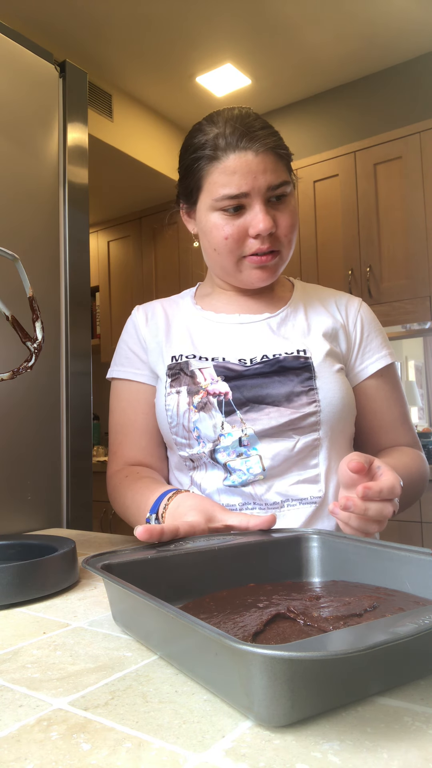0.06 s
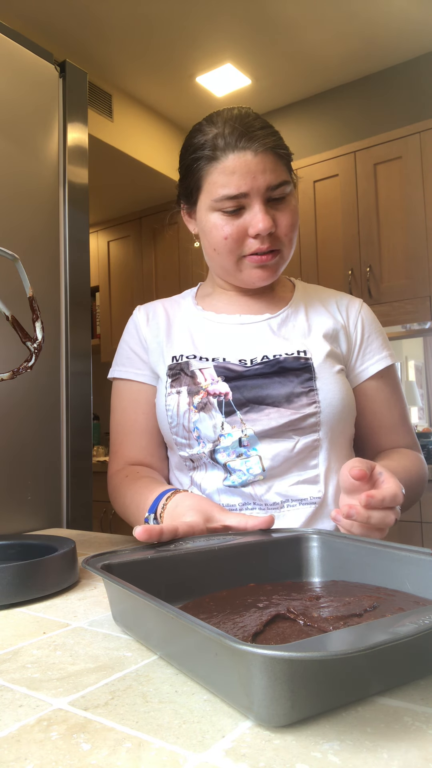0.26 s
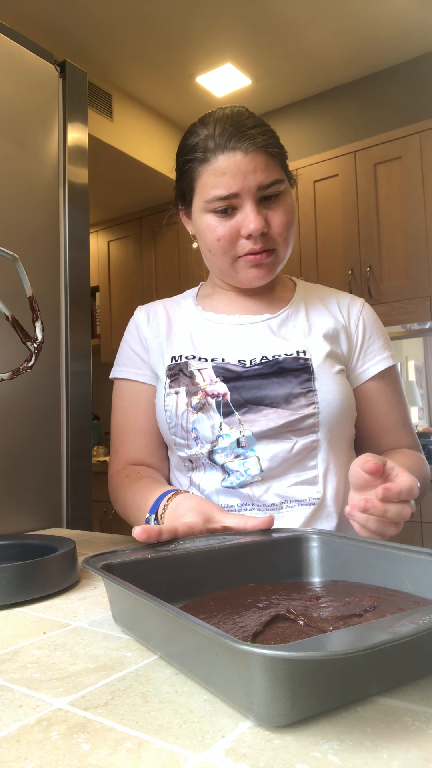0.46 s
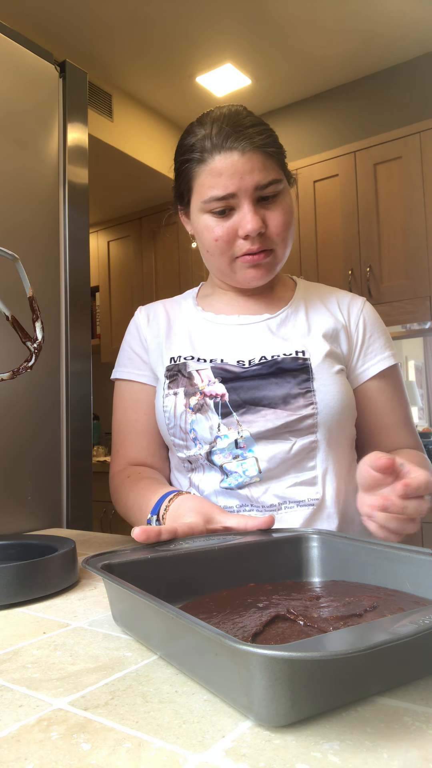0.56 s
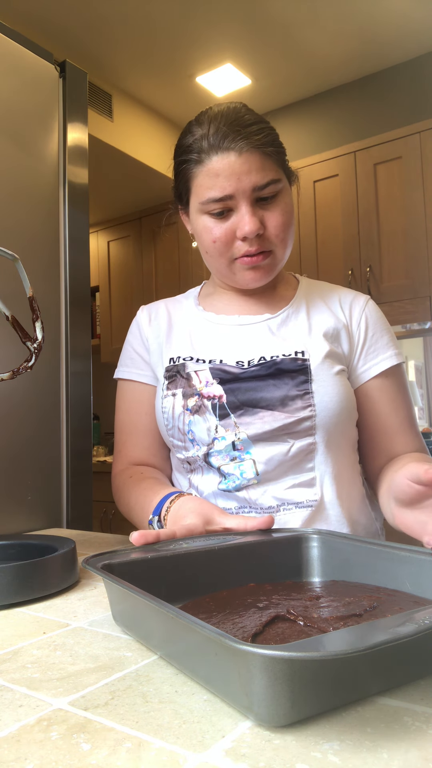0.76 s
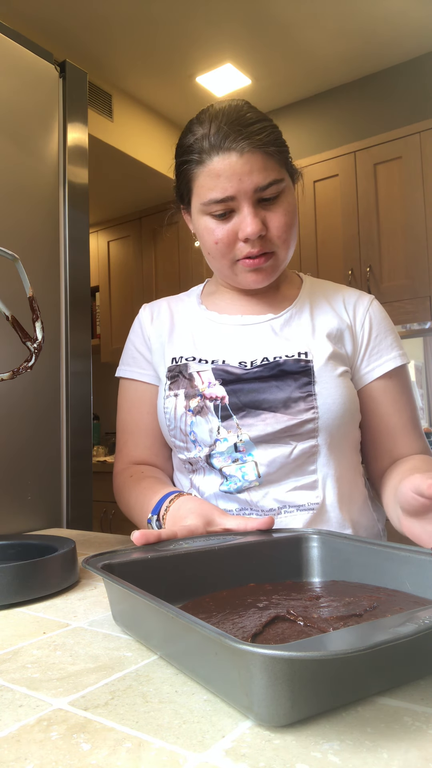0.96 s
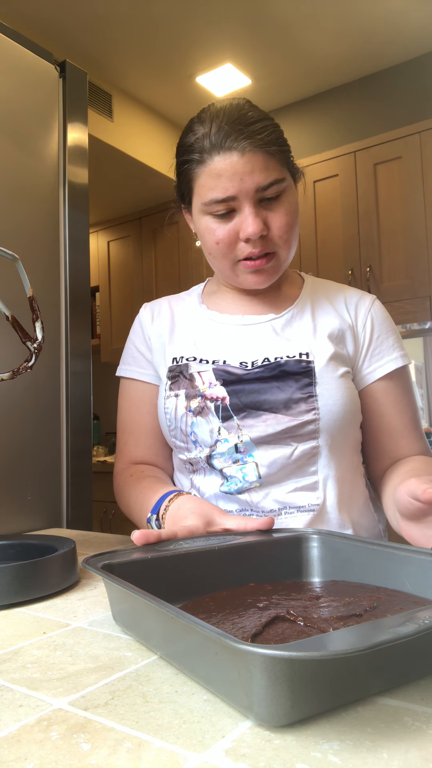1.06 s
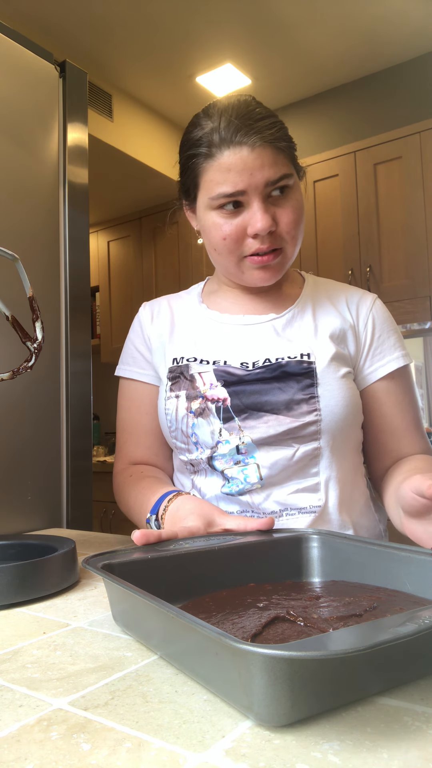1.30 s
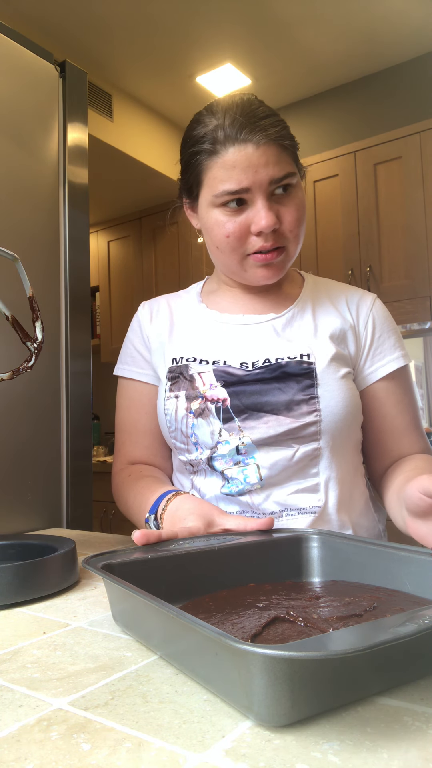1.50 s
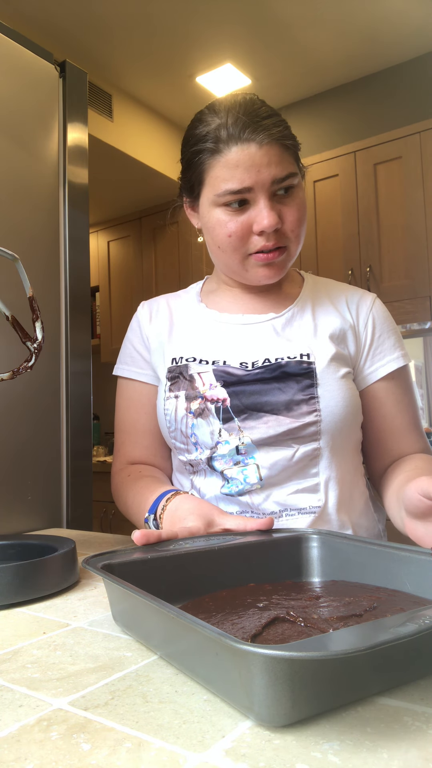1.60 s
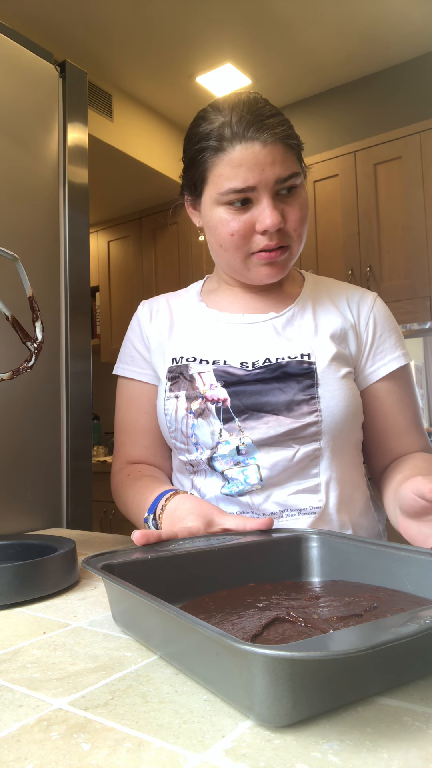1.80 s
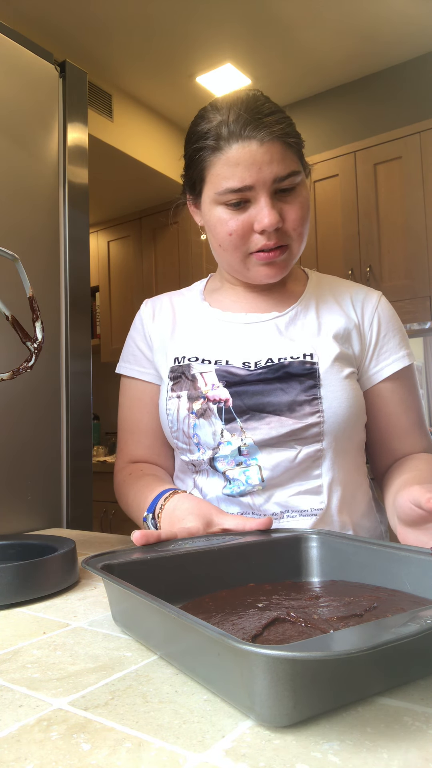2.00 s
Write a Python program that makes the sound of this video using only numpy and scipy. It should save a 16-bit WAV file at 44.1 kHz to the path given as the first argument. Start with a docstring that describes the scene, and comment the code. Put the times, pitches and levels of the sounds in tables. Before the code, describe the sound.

A batter-filled metal pan bonks hollowly on a kitchen counter, then clatters and settles.

```python
"""A metal baking pan full of batter lands on a tiled kitchen counter with one firm knock.
The batter damps its floor to a hollow bonk, the counter thuds under it and the bare rim rings faintly on.
Just over a second later the pan rattles briefly, its rim singing until damped, then settles softly.
A small hard kitchen answers each knock; the pan slides faintly and a refrigerator hums throughout."""
import sys
import numpy as np
from scipy import signal
from scipy.fft import rfft, irfft
from scipy.io import wavfile
from scipy.ndimage import uniform_filter1d

SR = 44100
rng = np.random.default_rng(int(sys.argv[2]) if len(sys.argv) > 2 else 0)


def generate_wav(sig):
    """Save sig (samples, or channels by samples) to the path in sys.argv[1] as 16-bit PCM at SR."""
    pcm = np.round(np.clip(np.atleast_2d(sig).T, -1, 1) * 32767).astype(np.int16)
    wavfile.write(sys.argv[1], SR, pcm)


N = 90404


def knocks():
    """Each contact shakes the counter, the batter-laden floor of the pan, its walls and the bare metal."""
    # start_s, contact_rise_s, thud_db, low_bonk_db, high_bonk_db, wall_db,
    # clack_db, tick_db, metal_db, shimmer_db
    hits = [(0.003, 0.0026, -46.5, -24.5, -39.5, -53, -47, -42, -78, -59.5),
            (0.038, .004, -56, -33.5, -54, -70, -51, -61, -69, -67),
            (0.1096, 0.0011, -51, -28, -26, -29, -21.5, -24, -61, -57),
            (0.1133, 0.0013, -23, 0, -9, -21, -21, -19, -60, -51),
            (1.431, 0.002, -55, -40, -22.5, -45, -39.5, -43.5, -55, -40.5),
            (1.437, 0.0038, -17, -18.5, -25.5, -41, -27.5, -36, -37, -53),
            (1.5871, 0.0011, -21, -16, -2, -32, -15, -30.5, -39, -37.5),
            (1.610, 0.0031, -40, -19.5, -17.5, -38, -21.5, -51, -50, -35.5),
            (1.683, 0.0049, -21, -17.5, -15, -47, -25.5, -31, -51, -39),
            (1.700, 0.0097, -25, -21, -28, -54, -29.5, -62, -61, -41.5),
            (1.826, 0.0017, -37.5, -38.5, -50, -66, -66, -48, -70, -51.5),
            (1.996, 0.0046, -45, -33, -32, -61, -41.5, -43.5, -71, -60),
            (2.014, 0.0066, -40, -24, -34, -52.5, -66, -59, -78, -61)]
    # ringing modes: pitch_hz, level_db, t60_s
    counter = [(93.5, 0.5, 0.13), (128.2, -5.5, 0.14), (176.7, -8, 0.095)]  # deep thud
    low_bonk = [(198.2, -20.5, 0.23), (249.5, 0, 0.081), (291.3, -16.5, 0.059)]  # the damped floor, lower group
    high_bonk = [(325.6, -13.5, 0.094), (371.4, -12.5, 0.19), (418, 0, 0.047), (470, -11.5, 0.031)]  # the damped floor, upper group
    walls = [(715, -3, 0.099), (811, -2.5, 0.069), (974, -2, 0.048), (1105.6, -9, 0.063), (1238, -7, 0.077),
             (2796, -11.5, 0.062), (2953, -12, 0.048), (3190, -11, 0.048), (6207, -10, 0.045),
             (6660, -17, 0.041)]  # damped ring of the pan's sides
    metal = [(1030, -1.5, .12), (2047, -11.5, 0.22), (2305, -7, 0.16), (2370, -5.5, 0.16),
             (2675, -18.5, 0.22), (2795, -13, 0.12), (2935, -20.5, 0.16), (3365, -19, 0.3),
             (4360, 1, 0.098), (4570, -19.5, 0.2), (5135, -7.5, 0.095), (5290, -17.5, 0.14)]  # short bare clink
    # noise colours: frequency_hz, density_db
    clack = [(30, -41), (120, 6.5), (450, 17.5), (600, 8), (1100, -3), (1600, -16), (2400, -13),
             (3050, -10.5), (3600, -16), (5000, -30), (7000, -15), (9500, -33), (16000, -47)]  # body of the contact
    tick = [(100, 11), (1000, 8), (3000, -2), (4200, -6.5), (5400, -5), (6400, 4), (7500, -8),
            (10000, -12.5), (14000, -16), (16000, -20)]  # its bright edge
    shimmer = [(300, -5), (1150, -1.5), (1500, -8), (2150, -10.5), (2380, 3), (2550, -5.5), (3050, -2),
               (3450, -22), (4400, -13), (4650, -25), (5100, -11), (5600, -32), (6100, -9), (6800, -38),
               (7400, -16), (9000, -35.5), (16000, -34.5)]  # dense overtones of the sheet metal
    out, t = np.zeros(N), np.arange(SR) / SR
    for start_s, contact_rise_s, *levels_db in hits:
        thud_db, low_db, high_db, wall_db, clack_db, tick_db, metal_db, shimmer_db = levels_db
        modes = (amp(thud_db) * ring(t, counter, rise_s=0.0031)
                 + amp(low_db) * ring(t, low_bonk, rise_s=0.0022)
                 + amp(high_db) * ring(t, high_bonk, rise_s=0.0022)
                 + amp(wall_db) * ring(t, walls, rise_s=0.0011)
                 + amp(metal_db) * ring(t, metal, rise_s=0.0029))
        contact = (amp(clack_db) * noise(clack, SR) * fade(t, t60_s=0.059)
                   + amp(tick_db) * noise(tick, SR) * fade(t, t60_s=0.03)
                   + amp(shimmer_db) * noise(shimmer, SR) * fade(t, t60_s=0.22))
        attack = 1 - np.exp(-t / contact_rise_s)
        add(out, start_s, modes + contact * attack)
    return out


def rim():
    """The rim sings clear notes until another touch damps it."""
    # spells of free ringing: start_s, stop_s, low_pair_db, overtone_db
    sings = [(0.191, 0.433, -56, -76), (1.458, 1.58, -40.5, -40.5), (1.594, 1.713, -51, -36)]
    # modes of the rim: pitch_hz, level_db, t60_s
    low_pair = [(1569, -1, 1.67), (1626, -9, 0.61)]
    overtones = [(2040, -5, 0.68), (2367, -3, 0.44), (2795, -2.5, 0.31)]
    rise_s = 0.0069
    out, t = np.zeros(N), np.arange(SR) / SR
    for start_s, stop_s, low_pair_db, overtone_db in sings:
        notes = amp(low_pair_db) * ring(t, low_pair, rise_s)
        notes += amp(overtone_db) * ring(t, overtones, rise_s)
        since_touch_s = np.maximum(t - (stop_s - start_s), 0)
        add(out, start_s, notes * fade(since_touch_s, t60_s=0.29))
    return out


def slide():
    """Faint friction as the pan shifts on the tile."""
    # swell of the scrape: time_s, level_db
    swell = [(0, -53.5), (0.102, -52), (.13, -59), (1.38, -80), (1.43, -61.5), (1.47, -82), (1.9, -61),
             (1.981, -59.5), (2.05, -58.5)]
    # colour of the scrape: frequency_hz, density_db
    colour = [(100, 15), (1100, 14), (2000, -3.5), (3500, 5.5), (5000, -3), (6500, 1), (9500, -15),
              (16000, -20)]
    level_db = np.interp(np.arange(N) / SR, *np.transpose(swell))
    return noise(colour, N) * amp(level_db)


def kitchen(sound):
    """Dense reflections off hard surfaces, each band dying at its own speed."""
    # decay of the room: frequency_hz, t60_s
    decay = [(80, 0.96), (170, 0.72), (260, 0.6), (500, .5), (800, .5), (1300, 0.73), (3000, 0.3749),
             (6500, 0.34), (11000, 0.2), (16000, .26)]
    # strength of the reflections: frequency_hz, gain_db
    colour = [(80, -14), (170, -0.5), (260, -8.5), (420, -3), (750, -10.5), (1300, -7), (3000, -3),
              (6500, -7.5), (14000, -6)]
    hz, frame_s, bands = signal.stft(rng.standard_normal(SR), SR, nperseg=512)
    bands = bands * fade(frame_s, read(decay, hz)[:, None])
    tail = signal.istft(bands, SR, nperseg=512)[1][:SR]
    onset = np.minimum(np.arange(SR) / SR / 0.012, 1)  # reflections build over 12 ms
    spectrum = rfft(tail * onset)
    smooth_power = np.convolve(abs(spectrum) ** 2, np.hanning(81) / 40, "same")
    even_spectrum = spectrum / np.sqrt(smooth_power)
    tail = irfft(even_spectrum * amp(read(colour, np.fft.rfftfreq(SR, 1 / SR))), SR)
    reflections = (tail * onset)[:SR * 3 // 4]
    return signal.fftconvolve(sound, reflections)[:N]


def refrigerator():
    """A low hum whose partials each waver slowly in phase."""
    # hum partials: pitch_hz, level_db
    partials = [(54, -74), (97, -61.5), (199, -69), (250, -64), (499.5, -65.5)]
    hum, t = np.zeros(N), np.arange(N) / SR
    for pitch_hz, level_db in partials:
        wander = uniform_filter1d(rng.standard_normal(N), size=3000)
        drift_rad = unit(uniform_filter1d(wander, size=3000))
        hum += amp(level_db) * np.sqrt(2) * np.sin(2 * np.pi * pitch_hz * t + drift_rad)
    return hum


def room_tone():
    """A soft, dark bed of steady air."""
    # colour of the air: frequency_hz, density_db
    air = [(25, -10), (60, -5), (92, -3), (150, -15), (250, -12.5), (370, -11.5), (450, -21), (640, -22.5),
           (900, -25), (2500, -33), (6500, -35.5), (10000, -41.5), (16000, -42)]
    return amp(-57) * noise(air, N)


def amp(db):
    """Decibels to gain."""
    return 10 ** (np.asarray(db) / 20)


def unit(x):
    """Scales to rms 1."""
    return x / np.sqrt(np.mean(x ** 2) + 1e-20)


def read(points, hz):
    """Reads a curve on a log-frequency axis."""
    points_hz, values = np.transpose(points)
    return np.interp(np.log(hz + 1), np.log(points_hz + 1), values)


def add(mix, start_s, sound):
    """Mixes a sound in at its start time."""
    part = mix[max(round(start_s * SR), 0):][:len(sound)]
    part += sound[:len(part)]


def fade(t, t60_s):
    """Exponential decay, 60 dB down at t60_s."""
    return np.exp(-np.log(1000) * t / t60_s)


def noise(colour, size):
    """Steady noise of a given colour, at rms 1."""
    gain = amp(read(colour, np.fft.rfftfreq(size, 1 / SR)))
    return unit(irfft(rfft(rng.standard_normal(size)) * gain, size))


def ring(t, modes, rise_s):
    """Dying sines of alternating sign with a soft attack."""
    sines = [(-1) ** k * amp(db) * fade(t, t60_s) * np.sin(2 * np.pi * hz * t)
             for k, (hz, db, t60_s) in enumerate(modes)]
    return (1 - np.exp(-t / rise_s)) * sum(sines)


def scene():
    """The pan and the kitchen's answer to its knocks, over hum and air, in mono."""
    pan = knocks()
    return (pan + kitchen(pan) + rim() + slide() + refrigerator() + room_tone())[None]


def record(dry):
    """Rolls off the deep bass and cuts the highest treble."""
    low_cut_hz, high_cut_hz = 47, 16350
    thinned = signal.sosfilt(signal.butter(2, low_cut_hz, "high", fs=SR, output="sos"), dry)
    treble_cut = signal.firwin(511, high_cut_hz, window=("kaiser", 9), fs=SR)
    return signal.oaconvolve(thinned, treble_cut[None], "same")


dry = scene()
out = record(dry)
generate_wav(out)
```